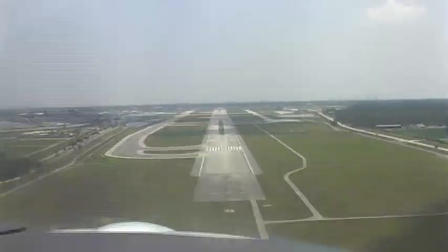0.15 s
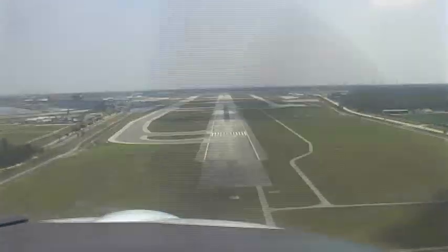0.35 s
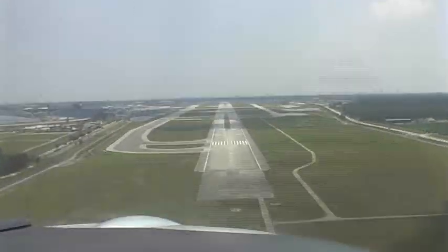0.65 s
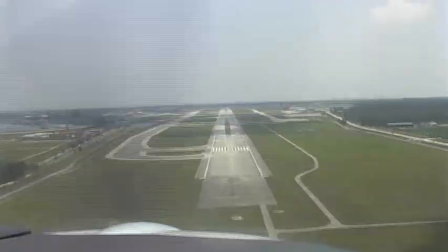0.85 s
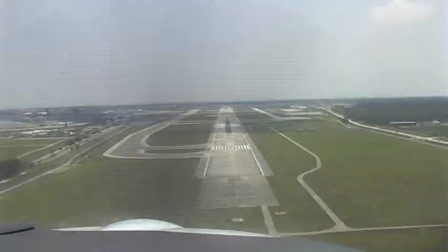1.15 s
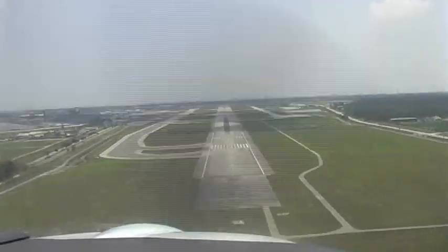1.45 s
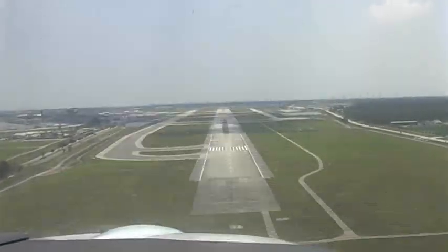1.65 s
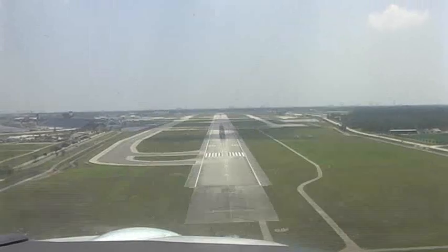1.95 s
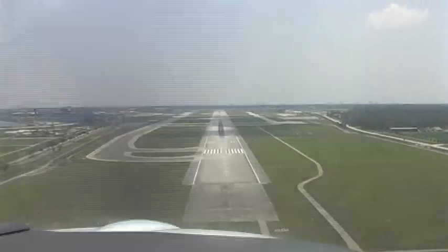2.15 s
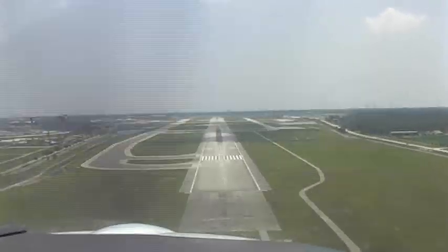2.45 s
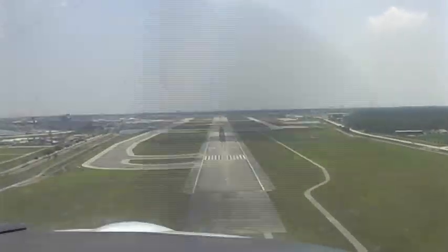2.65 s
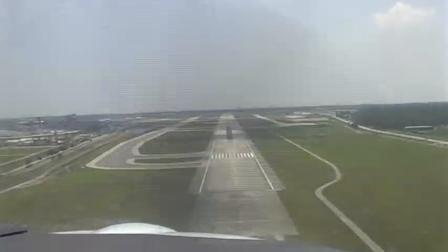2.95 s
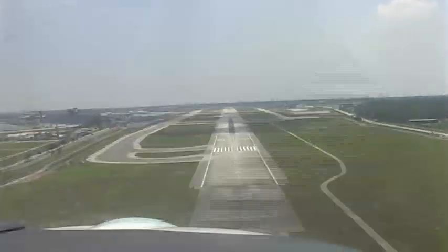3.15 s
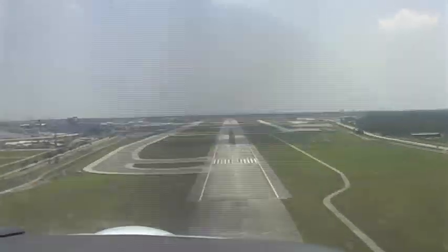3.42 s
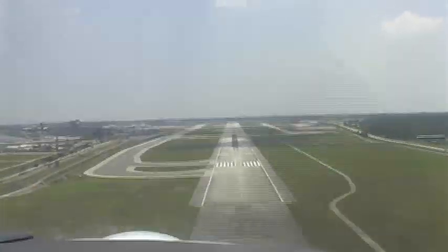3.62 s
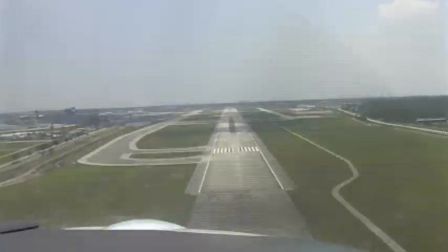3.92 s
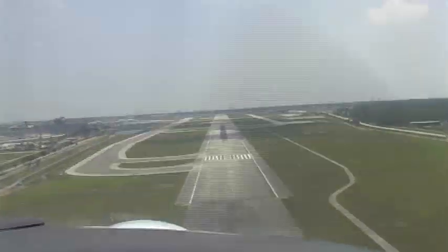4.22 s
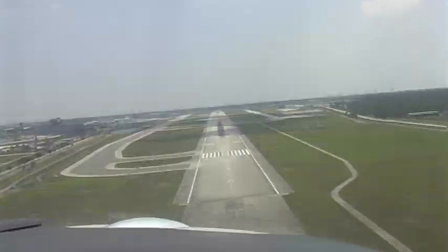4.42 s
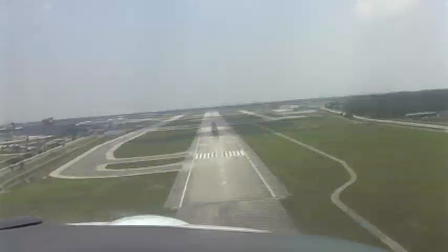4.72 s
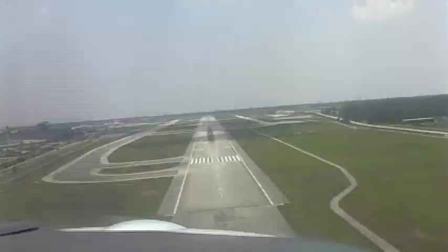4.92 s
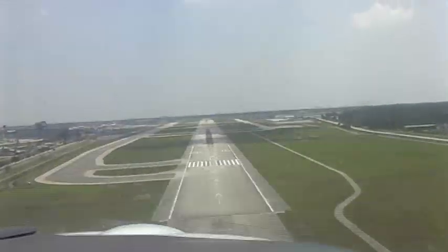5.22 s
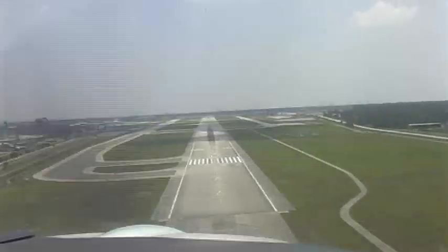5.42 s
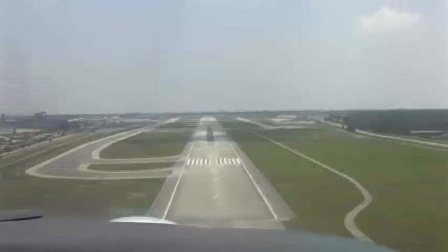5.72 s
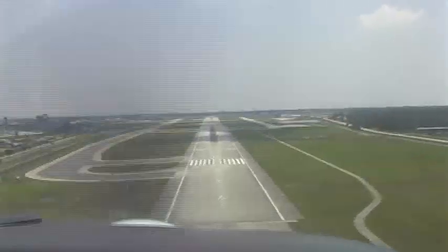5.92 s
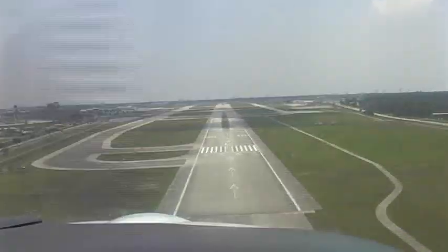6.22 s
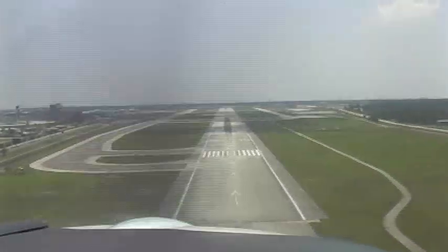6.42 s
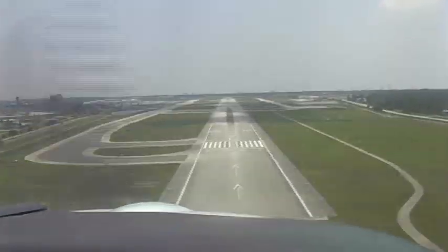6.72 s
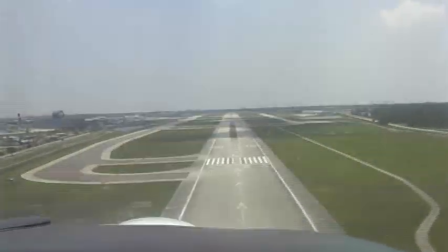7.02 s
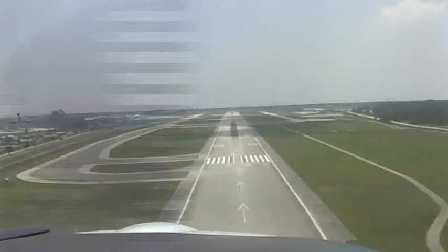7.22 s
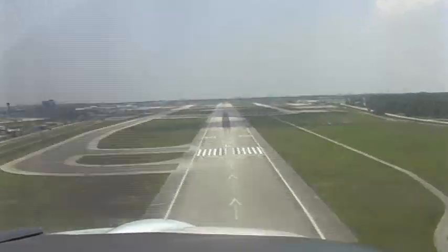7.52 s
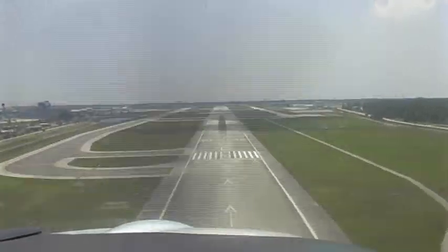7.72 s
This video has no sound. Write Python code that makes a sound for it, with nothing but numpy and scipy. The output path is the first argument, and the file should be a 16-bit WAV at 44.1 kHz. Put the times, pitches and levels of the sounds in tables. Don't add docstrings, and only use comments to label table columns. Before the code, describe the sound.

Inside a small propeller aircraft approaching a runway, a piston engine and propeller drone low and steady, the pitch sagging very slightly. Wind roars through the cabin skin with small gusts and a fluttering pulse. A faint air vent whistle wavers in and out, clearer near the end. A small camera microphone in the cabin picks it all up, close and dense.

```python
import sys
import numpy as np
from scipy import signal
from scipy.fft import rfft, irfft, next_fast_len
from scipy.io import wavfile
from scipy.ndimage import uniform_filter1d

SR = 44100
rng = np.random.default_rng(int(sys.argv[2]) if len(sys.argv) > 2 else 0)


def waveform_to_disk(signal):
    frames = np.transpose(np.atleast_2d(signal))
    scaled = np.clip(frames, -1, 1) * 32767
    samples = np.round(scaled).astype(np.int16)
    wavfile.write(sys.argv[1], SR, samples)


def rack_gain(trim_db):
    fader = np.asarray(trim_db, float)
    return 10 ** (fader / 20)


N = 346626


def on_log(hz, points):
    point_hz, level_db = np.transpose(points)
    return np.interp(np.log(hz), np.log(point_hz), level_db)


def walk(rate_hz):
    hold = int(SR / rate_hz)
    held = np.repeat(rng.standard_normal(N // hold + 1), hold)
    return 1.3 * uniform_filter1d(uniform_filter1d(held, hold), hold)[:N]


def swells(crest_s, rise_s, fall_s, lift_db):
    s = np.arange(0, N / SR, .001)
    late_s = s[:, None] - crest_s
    width_s = np.where(late_s < 0, rise_s, fall_s)
    return np.interp(np.arange(N) / SR, s, np.exp(-.5 * (late_s / width_s) ** 2) @ lift_db)


def wavering_tone(hz, level_db):
    return np.sqrt(2) * rack_gain(level_db) * np.cos(2 * np.pi * np.cumsum(hz) / SR)


def gyro():
    pitch_hz, level_db = 1059, -52
    return wavering_tone(pitch_hz + 1.5 * walk(3), level_db + 1.9 * walk(1.75))


# crest [s], length [s], lift [dB]
WHISTLE_SWELLS = [
    (.4, .8, 9),
    (3.05, 0.26, 10),
    (3.55, 0.57, 12),
    (4.0, 0.33, 6),
    (5.65, .3, 7.5),
    (6.2, .4, 8),
    (6.9, 0.28, 6.5),
    (7.25, 0.38, 14),
    (7.86, 0.25, 16),
]


def vent():
    pitch_hz, width_hz, level_db = 835, 6, -50
    hz = pitch_hz + .5 * width_hz * walk(14)
    crest_s, length_s, lift_db = np.transpose(WHISTLE_SWELLS)
    flow_db = level_db + swells(crest_s, length_s / 2, length_s / 2, lift_db)
    tone = wavering_tone(hz, flow_db + 3.0 * walk(15))
    return np.outer(rack_gain(np.array([.8, -.8])), tone)


# pitch [Hz], level [dB per Hz]
ROAR_SPECTRUM = [(20, -81), (40, -54), (62, -53.5), (85, -44), (150, -43), (240, -47), (390, -57.5),
                 (700, -59.5), (1100, -64.5), (2400, -70.5), (5000, -75), (8500, -82.5), (12000, -90),
                 (15500, -100)]
# pitch [Hz], level [dB per Hz]
DIFFUSE_SPECTRUM = [(20, -77), (70, -66), (250, -73), (550, -67.5), (1000, -72.5), (2600, -77), (5000, -88),
                    (8000, -91), (11000, -93), (13500, -98), (15500, -104)]
# pitch [Hz], left minus right [dB]
EAR_LEAN = [(60, 1), (110, 0.5), (200, -1.5), (380, -2.5), (700, 2.5), (1290, 0.5), (2380, 1.5), (4400, -1),
            (8120, 0), (15000, -0.5)]
# pitch [Hz], width [Hz], common lift [dB], diffuse lift [dB]
PANEL_MODES = [(98, 14, -3.5, 0), (155, 35, -0.5, 0), (224, 8.4, 4, -4), (348, 26, 2, 5),
               (449, 74, 7.5, 1.5), (715, 84, 0.5, 3), (774, 40, -2.5, 1), (983, 54, 2.5, 1),
               (852, 160, 4.5, -3), (1338, 180, 4.5, -4), (1510, 90, -0.5, 2.5), (1900, 175, 5.5, 2.5),
               (2110, 120, 2.5, 2.5), (2793, 130, 4.5, -1), (3330, 880, 1.5, 2.5), (4350, 200, 0, 4),
               (5130, 1000, -1, 1), (6500, 1500, -0.5, 0)]
# crest [s], strength [dB], negative for a lull
GUST_SWELLS = [(.34, 1.8), (.62, 1), (1.0, -0.7), (1.68, 1.2), (1.86, 1.6), (1.96, -1), (2.56, 0.7),
               (2.8, .9), (3.1, -1), (3.4, -1.6), (3.72, 1), (4.2, 1), (4.58, 0.3), (4.84, 4.5),
               (4.92, -3.5), (5.1, 1.2), (5.23, -1), (5.47, 1), (5.85, 0.7), (6.4, 1), (6.58, -0.8),
               (7.46, -1), (7.72, .6)]


def panel_noise(size, hz, spectrum, lift_db):
    white = rfft(rng.standard_normal(size)) * np.sqrt(SR / 2)
    return white * rack_gain(on_log(hz, spectrum) + lift_db)


def slipstream(turn):
    flicker_db, buffet_db, heave_db = 0.56, 0.63, 1.24
    gust_rise_s, gust_fall_s = 0.098, 0.053
    split_hz = 260
    size = next_fast_len(N)
    hz = np.maximum(np.arange(size // 2 + 1) * SR / size, 1)
    common_db, diffuse_db = sum(np.outer([common, diffuse], 1 / (1 + (2 * (hz - mode_hz) / width_hz) ** 2))
                                for mode_hz, width_hz, common, diffuse in PANEL_MODES)
    mid = panel_noise(size, hz, ROAR_SPECTRUM, common_db)
    side = panel_noise(size, hz, DIFFUSE_SPECTRUM, diffuse_db)
    lean = rack_gain(on_log(hz, EAR_LEAN) / 2)
    ears = np.array([mid * lean + side, mid / lean - side])

    crest_s, strength_db = np.transpose(GUST_SWELLS)
    rush_db = swells(crest_s, gust_rise_s, gust_fall_s, strength_db)
    rumble_db = 0.28 * rush_db + heave_db * walk(7)
    buffet = walk(14)
    pulse_db = .45 * np.cos(turn - 3.7)
    out = np.zeros((2, N))
    for octave in np.arange(4, 14.5, .5):
        band_hz = 2 ** octave
        share = np.clip(1 - 2 * abs(np.log2(hz) - octave), 0, 1)
        high = 1 / (1 + (split_hz / band_hz) ** 2)
        gust_db = 0.68 * high * rush_db + 1.13 * (1 - high) * rumble_db
        gust_db += buffet_db * buffet / (1 + 3000 / band_hz)
        level_db = gust_db + flicker_db * walk(9) + pulse_db
        out += rack_gain(level_db) * irfft(ears * share, size)[:, :N]
    return out


# time [s], firing rate [Hz], power [dB]
ENGINE_RUN = [(0.0, 67.4, 0), (0.4, 67.38, 0), (0.9, 67.17, -.8), (2.1, 66.72, 0), (2.6, 66.41, .6),
              (3.5, 66.35, -.6), (3.9, 66.37, .1), (4.25, 66.43, -.5), (4.8, 66.22, .4), (5.4, 66.08, .7),
              (5.7, 66.12, 1.2), (6.05, 66.18, .7), (6.65, 65.9, -1), (7.2, 66.2, .3), (7.5, 66.36, -.7),
              (7.86, 66.41, -.9)]


def crank():
    time_s, rate_hz, power_db = np.transpose(ENGINE_RUN)
    s = np.arange(N) / SR
    hz = np.interp(s, time_s, rate_hz)
    turn = 2.45 + 2 * np.pi * np.cumsum(hz) / SR
    return hz, np.interp(s, time_s, power_db), turn


# multiple of the firing rate, level [dB], side minus mid [dB]
ENGINE_ORDERS = [(1.0, -17.3, -20.3), (1.25, -33.6, -28.8), (2.0, -19.5, -30.0), (2.5, -35.9, -27.6),
                 (3.0, -34.6, -6.9), (4.0, -26.6, -26.5), (4.25, -38.7, -28.3), (4.5, -38.7, -29.9),
                 (4.75, -44.9, -20.2), (5.0, -33.3, -14.3), (5.25, -39.8, -26.2), (5.5, -41.8, -20.4),
                 (5.75, -44.7, -30.0), (6.5, -42.2, -18.0), (7.0, -43.3, -20.1), (7.5, -52.6, -30.0),
                 (8.0, -45.9, -13.4), (8.75, -48.6, -14.0), (9.0, -50.5, -10.8), (9.25, -46.7, -15.9),
                 (9.5, -53.7, -30.0), (10.0, -50.8, -13.6), (12.0, -52.4, -18.1), (13.5, -50.4, -24.8),
                 (15.0, -52.5, -12.0), (15.75, -57.8, -16.1), (16.0, -51.9, -10.7)]
# multiple, slope [dB per Hz of firing rate], waver [dB]
CABIN_SLOPES = [
    (1, 0, 0),
    (2, -1.6, .9),
    (3, 5, 1.5),
    (4, 1.4, .6),
    (5, 1, 1),
    (6.5, 0, 2.5),
]


def engine(hz, power_db, turn):
    lead, quarter_turn = .5, np.pi / 2
    cabin = {order: (slope, waver_db) for order, slope, waver_db in CABIN_SLOPES}
    mid, side = np.zeros(N), np.zeros(N)
    for order, level_db, side_db in ENGINE_ORDERS:
        if order in cabin:
            slope, waver_db = cabin[order]
            level_db = level_db + power_db + slope * (hz - hz.mean()) + waver_db * walk(2.7)
        else:
            level_db = level_db + 1.5 * walk(3)
        start = rng.uniform(0, 2 * np.pi)
        if order % 1 == 0:
            start = (lead + order * quarter_turn * (order % 2)) * (order > 1)
        phase = order * turn + start + .05 * (order - 1) * walk(3.12)
        mid += np.sqrt(2) * rack_gain(level_db) * np.cos(phase)
        side += np.sqrt(2) * rack_gain(level_db + side_db) * np.sin(phase)
    return np.array([mid + side, mid - side])


def scene():
    hz, power_db, turn = crank()
    return gyro() + vent() + slipstream(turn) + engine(hz, power_db, turn)


def top_cut(x):
    return signal.sosfilt(signal.butter(12, 15620, fs=SR, output="sos"), x)


# start [s], end [s]
MONO_SPELLS = [(.5, .54), (.63, .81), (1.04, 1.19), (1.56, 1.74), (3.17, 3.2), (3.45, 3.54), (4.2, 4.3),
               (4.56, 4.64), (4.99, 5.14), (6.0, 6.08), (6.16, 6.3), (7.77, 7.8)]


def record(dry):
    left, right = np.tanh(.3 * dry) / .3
    s = np.arange(N) / SR
    spells = sum(1. * (s > start_s) * (s < end_s) for start_s, end_s in MONO_SPELLS)
    folded = uniform_filter1d(spells, size=600)
    treble_filter = signal.butter(8, 4500, "high", fs=SR, output="sos")
    side_treble = signal.sosfiltfilt(treble_filter, (left - right) / 2)
    return top_cut(np.array([left - folded * side_treble, right + folded * side_treble]))


dry = scene()
out = record(dry)
waveform_to_disk(out)
```